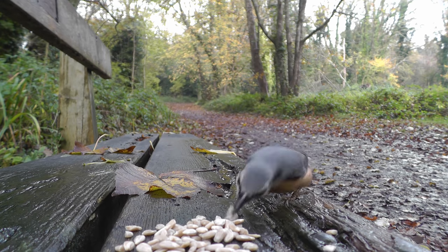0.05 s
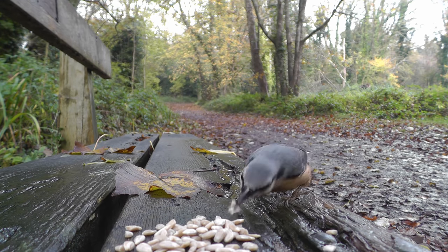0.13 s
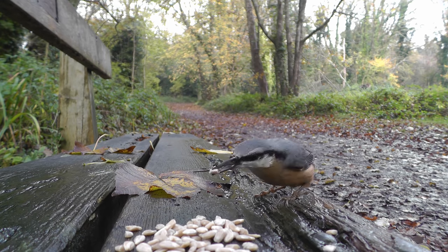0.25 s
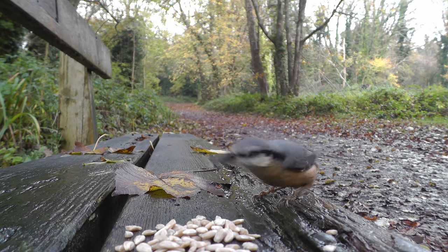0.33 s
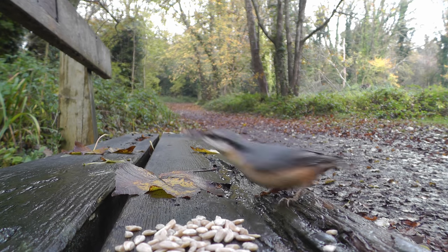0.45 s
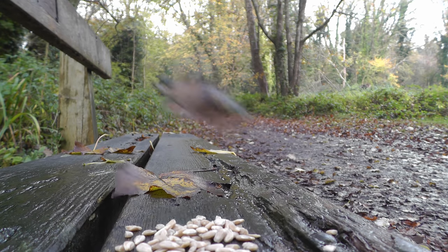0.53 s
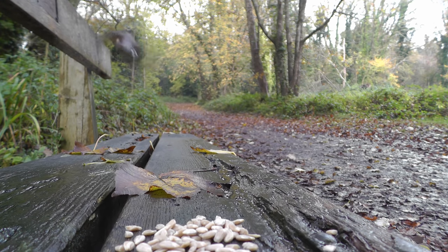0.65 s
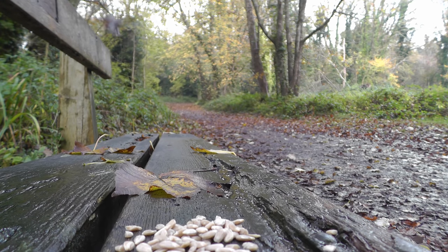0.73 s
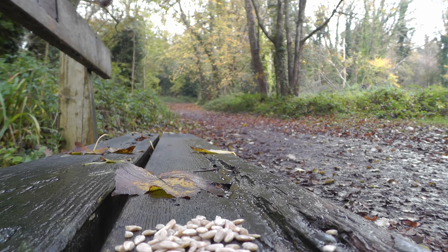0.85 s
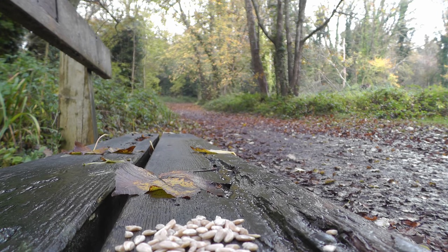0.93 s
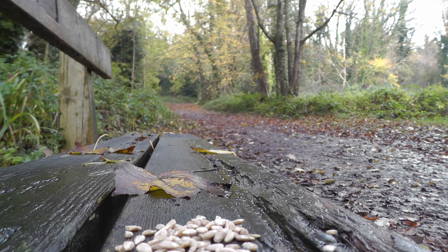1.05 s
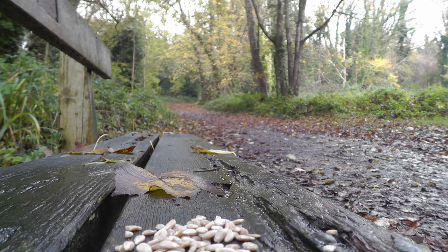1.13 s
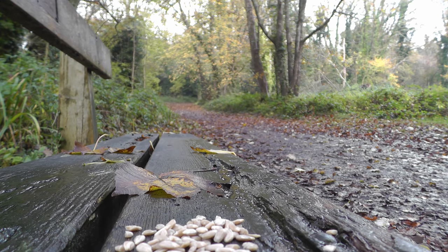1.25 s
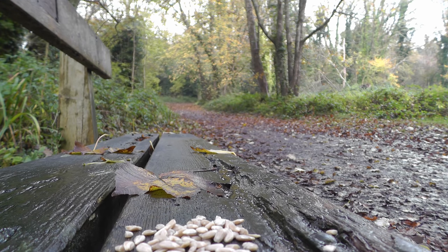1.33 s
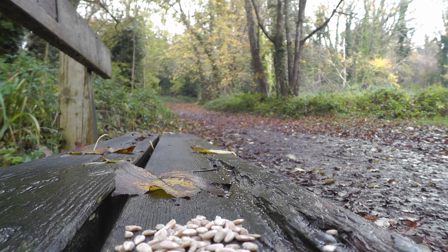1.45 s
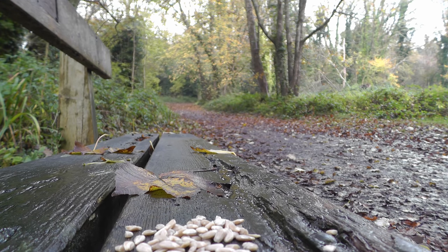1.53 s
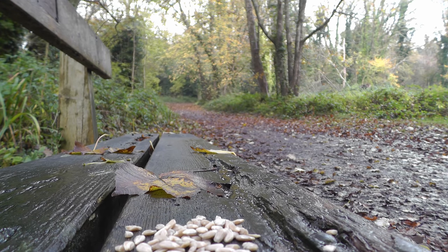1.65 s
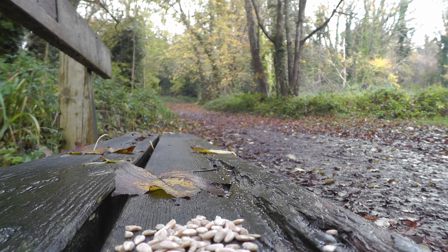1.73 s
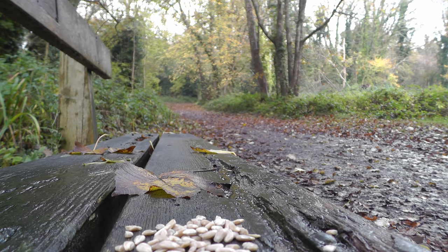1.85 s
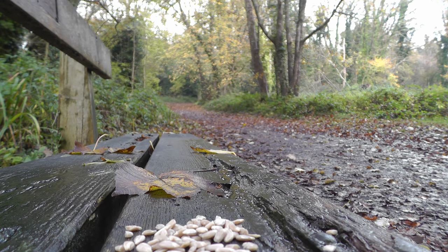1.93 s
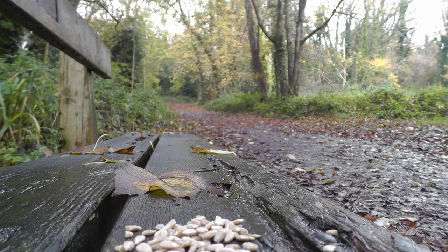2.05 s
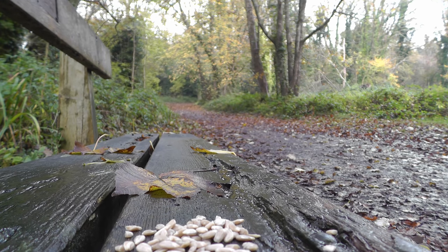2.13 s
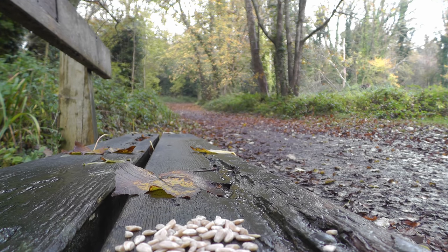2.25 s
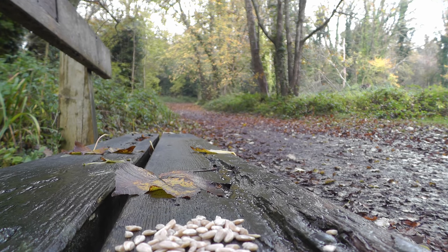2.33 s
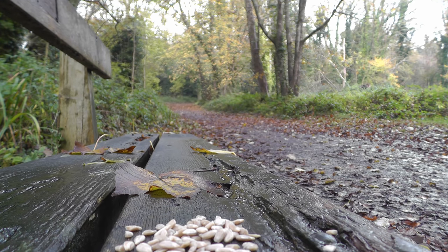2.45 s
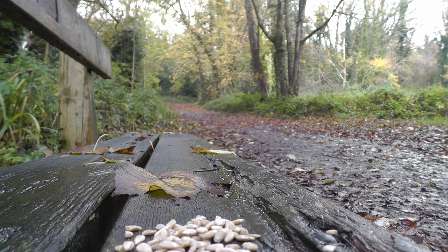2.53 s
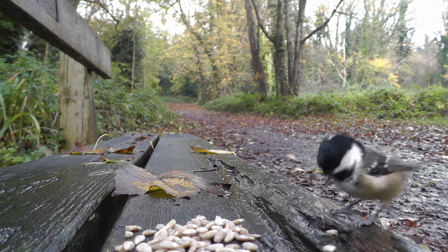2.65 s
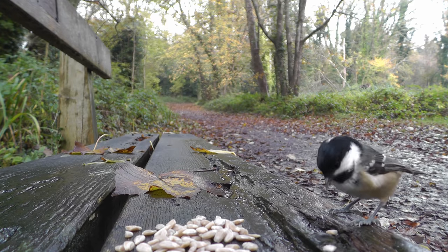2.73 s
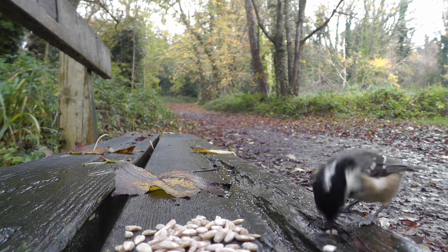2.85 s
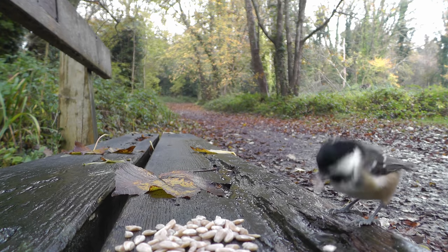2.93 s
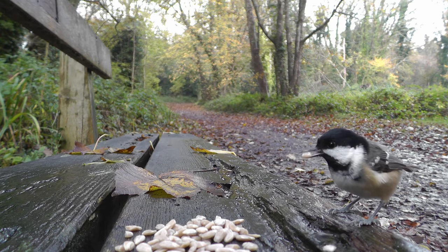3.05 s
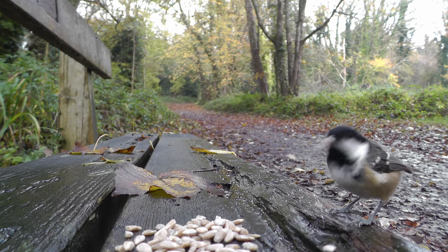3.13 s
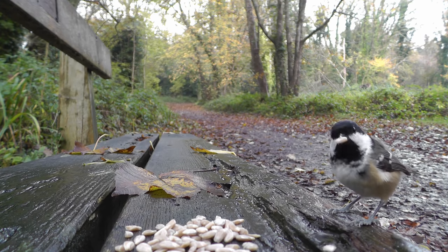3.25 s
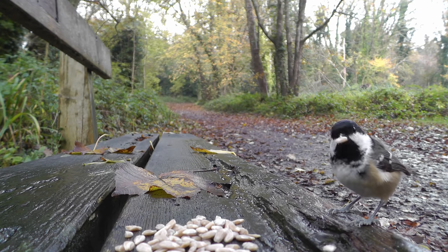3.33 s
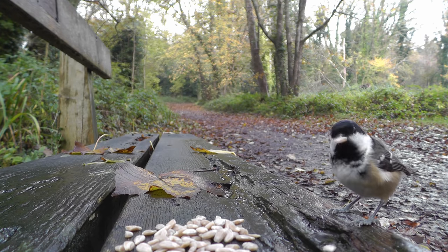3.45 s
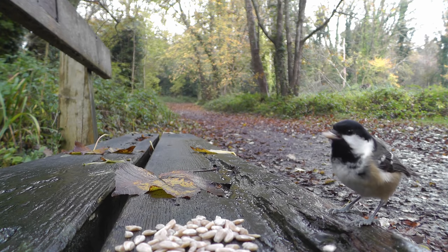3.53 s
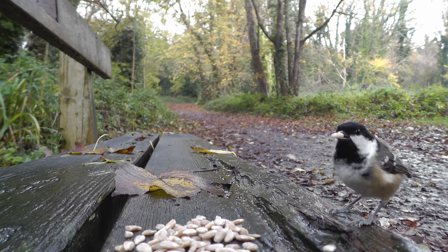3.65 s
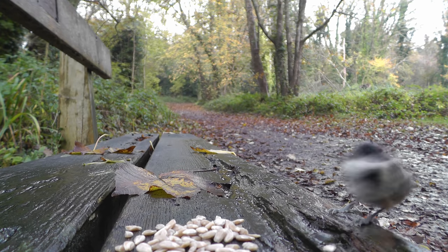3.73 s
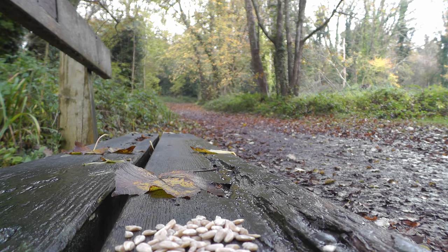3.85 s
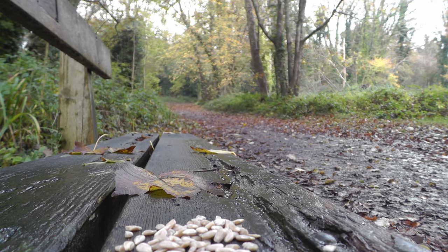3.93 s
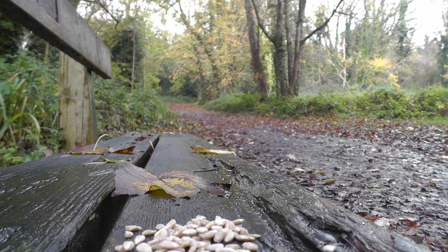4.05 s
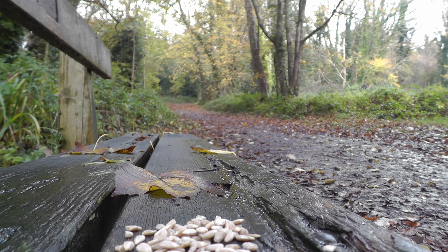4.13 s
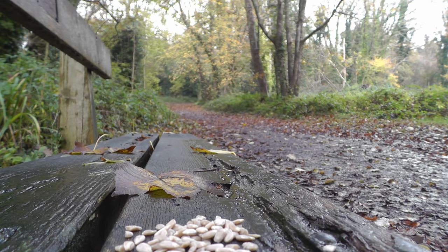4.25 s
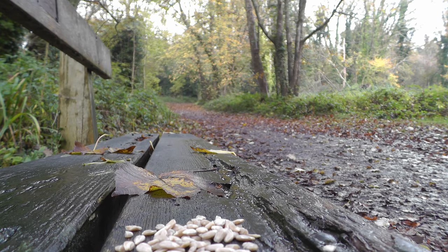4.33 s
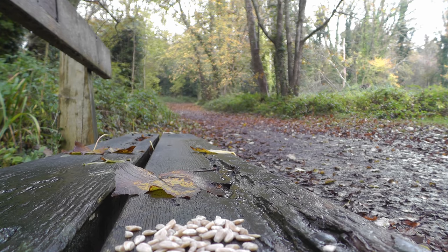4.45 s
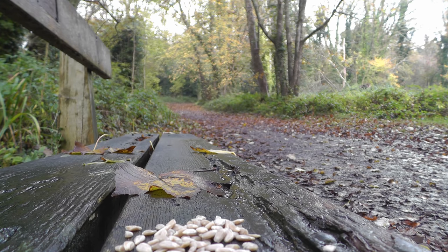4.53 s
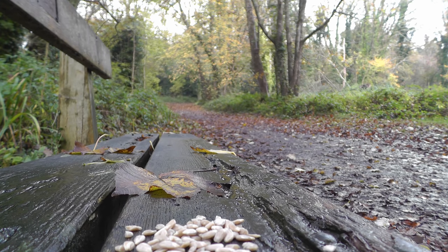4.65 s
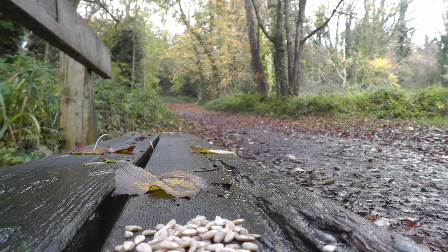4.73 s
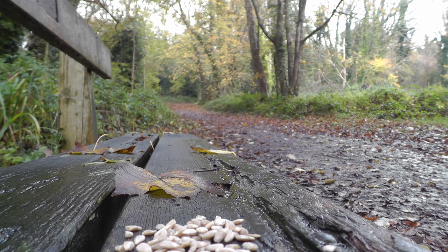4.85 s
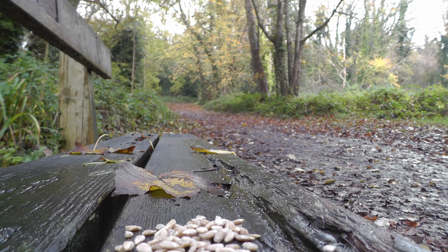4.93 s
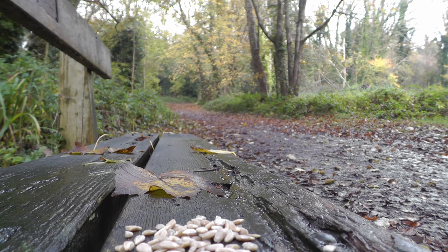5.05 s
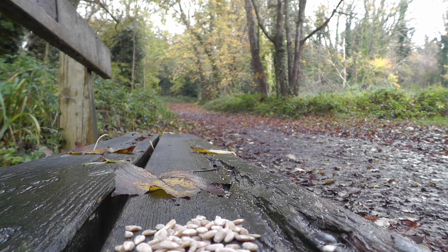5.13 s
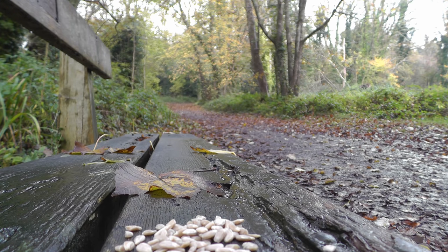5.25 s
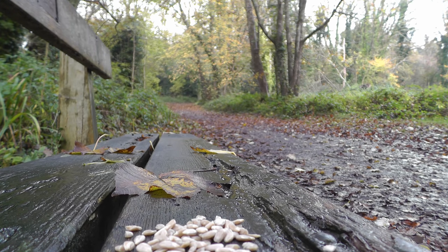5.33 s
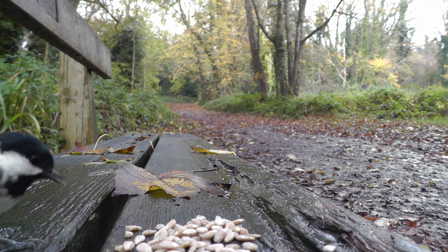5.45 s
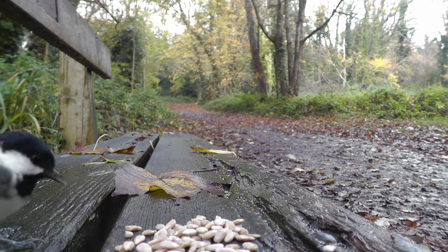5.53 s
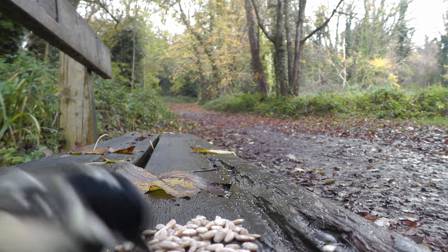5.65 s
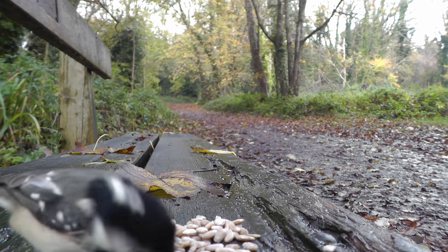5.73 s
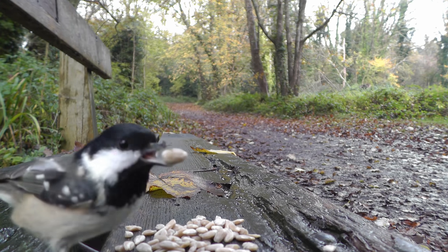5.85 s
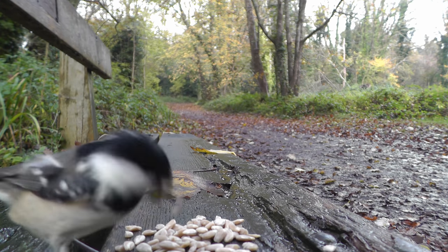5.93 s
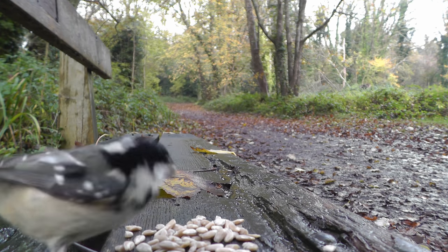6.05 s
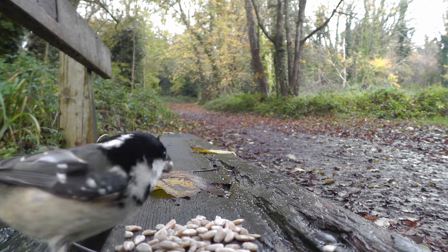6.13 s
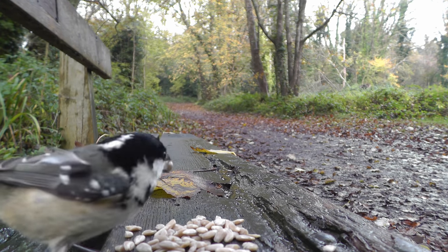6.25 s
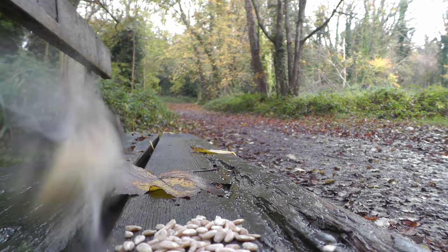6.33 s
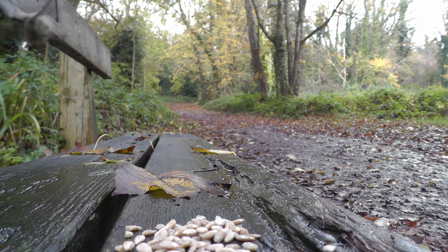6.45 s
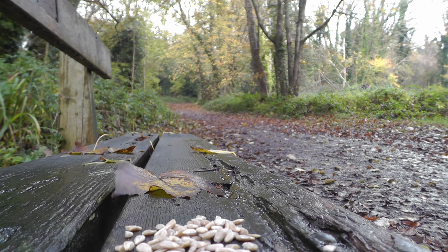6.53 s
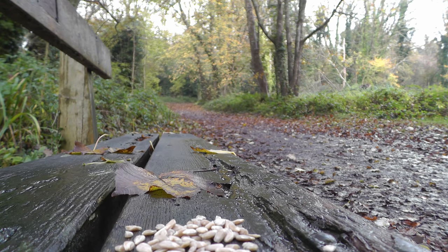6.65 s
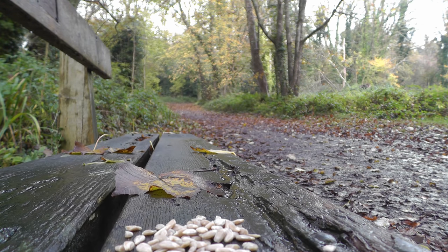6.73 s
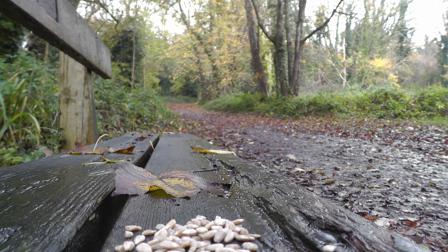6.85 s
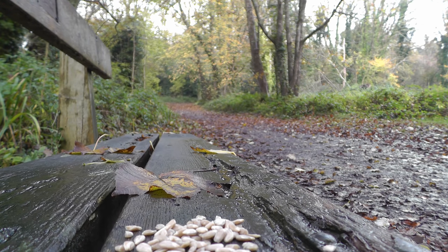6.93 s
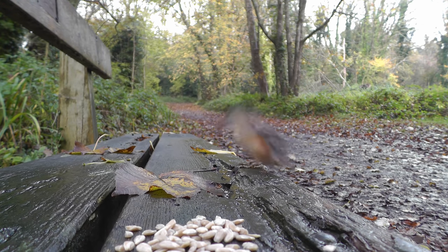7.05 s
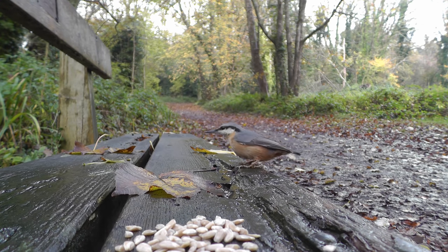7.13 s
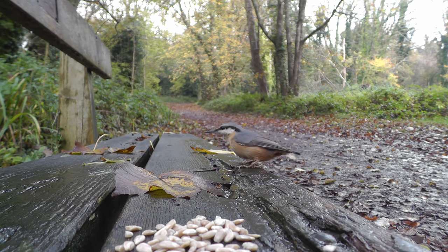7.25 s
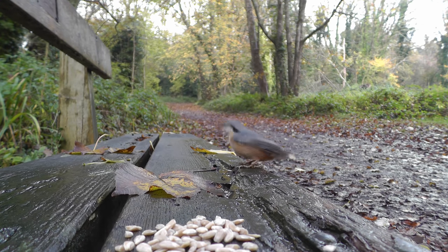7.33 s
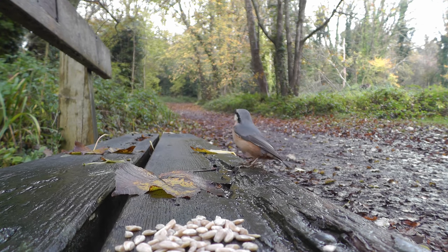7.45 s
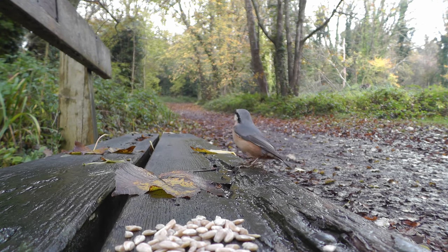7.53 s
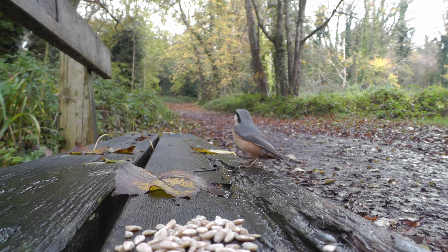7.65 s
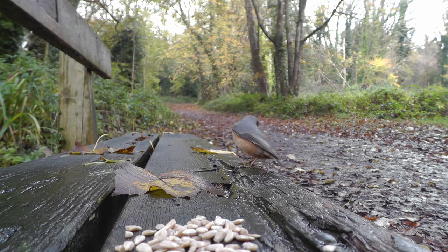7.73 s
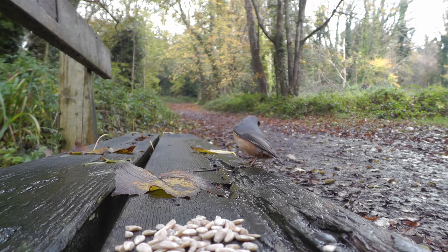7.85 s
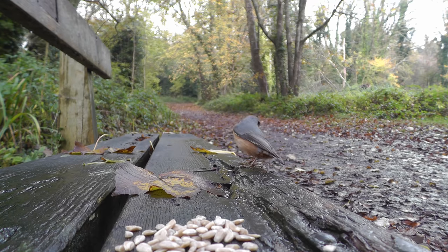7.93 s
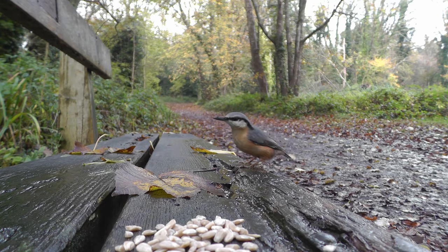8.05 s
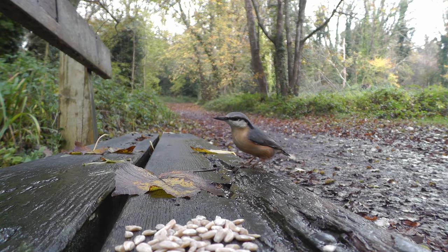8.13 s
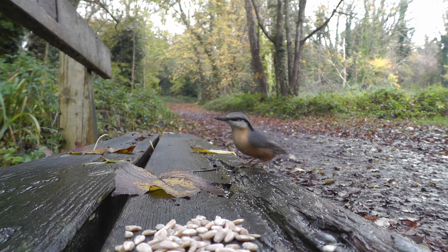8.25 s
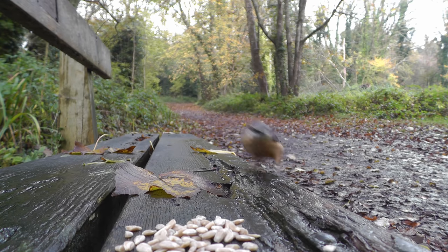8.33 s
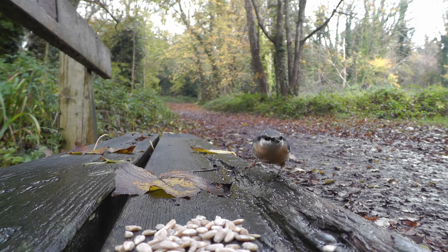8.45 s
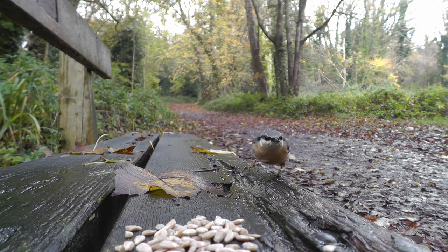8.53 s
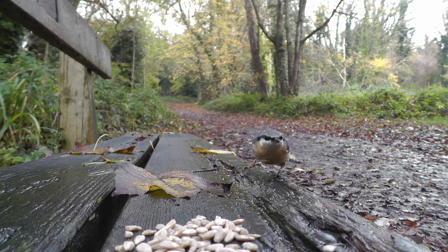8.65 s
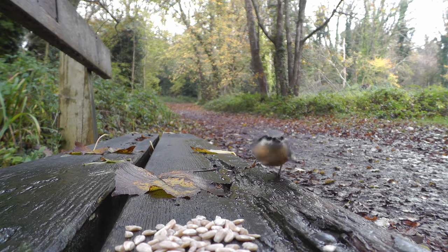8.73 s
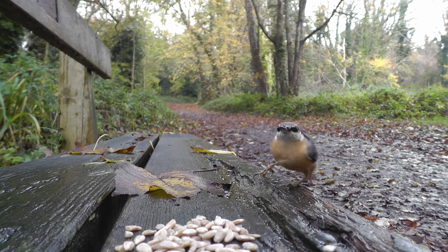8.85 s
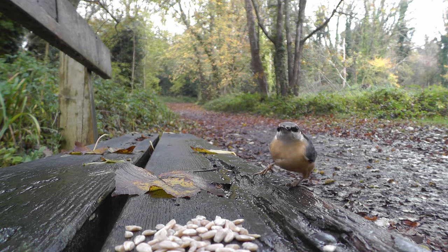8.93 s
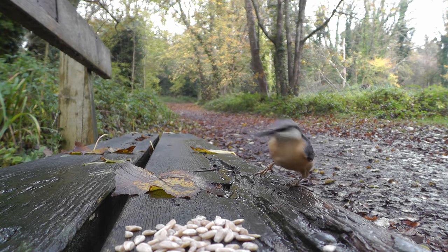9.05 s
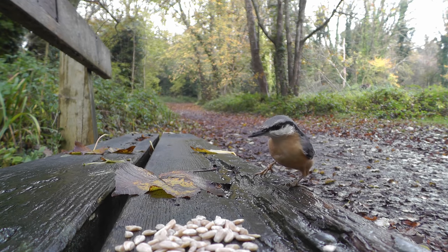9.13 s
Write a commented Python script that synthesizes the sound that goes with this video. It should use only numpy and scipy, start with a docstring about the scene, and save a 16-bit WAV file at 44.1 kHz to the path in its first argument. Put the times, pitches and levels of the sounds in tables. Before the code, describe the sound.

A quiet, wide murmur of far road and leaves runs throughout, heard close to a wooden bench among echoing trees. At 0.5 s a loud, high chip meets a fast flutter of about six wingbeats, with ticks and weakening chips to 1.2 s. A small low double caw comes at 1.7 s amid faint chips. Wings approach at 2.3-2.6 s, ending in sharp landing ticks. At 3.75-4 s a takeoff drums strongly with deep air thumps, then a thin wavering whistle and a far sliding note. Rapid scolding chatter runs 5.1-5.4 s, with brief bursts after 6 s. Wings flurry at 6.3-6.5 s; bright sliding notes and chips cluster at 6.7-6.95 s as another bird flutters in, landing with a tick near 7.05 s. A chip follows at 7.3 s, short chatter at 7.85 s, a clear clicked chip at 8.73 s, then a light scuff and tiny ticks.

```python
"""Small birds' wings drum past the microphones: each stroke is a low air push, a flap and a feather hiss.
Near birds give short arched chips and one held whistle, built from sliding tones. Farther birds send
sliding notes, a low caw and chatter, smeared by the trees into echoes made from fading noise. Claws and
bills tick and scuff on a wooden bench, and a click opens one chip: short bursts through a resonance.
A far road and leaves murmur as shaped noise."""
import sys
import numpy as np
from scipy import signal
from scipy.fft import rfft, irfft, next_fast_len
from scipy.io import wavfile
from scipy.ndimage import uniform_filter1d, map_coordinates

SR = 44100
rng = np.random.default_rng(int(sys.argv[2]) if len(sys.argv) > 2 else 0)


def dump(signal):
    """Clip the signal to [-1, 1] and save it as 16-bit WAV at the path in sys.argv[1]."""
    limited = np.clip(np.atleast_2d(signal).T, -1, 1)
    pcm = np.round(limited * 32767).astype(np.int16)
    wavfile.write(sys.argv[1], SR, pcm)


N = 405719

# Road murmur and leaves, shape of the spectrum: pitch_hz, relative_level_db
AIR_SPECTRUM = [(20, -35), (50, -16), (110, -0.5), (210, -1.5), (440, -8), (650, -8), (1270, -13),
                (2160, -22.5), (2780, -18), (3900, -23), (4600, -19.5), (5840, -20.5), (7000, -24),
                (11300, -38)]
# How much the murmur is shared by left and right: pitch_hz, likeness (1 = the same)
AIR_LIKENESS = [(60, 0.9), (180, 0.96), (550, 0.9), (1650, 0.62), (4970, 0.97), (15000, 0.35)]
# How far the murmur leans to the left: pitch_hz, left_over_right_db
AIR_LEAN = [(60, -0.5), (950, -1), (15000, -1.5)]
AIR_DB = -47.5
TOP_HZ = 15830  # nothing is kept from here up

# Claws or feather tips dragging: start_s, length_s, level_db (before its swell), centre_hz
SCUFFS = [(8.775, 0.043, -48.5, 1170), (2.45, 0.1, -53, 4700)]
# Short ticks: claws and bills on the planks, and the click that opens the chip at 8.73 s:
# start_s, peak_db (before panning), ring_hz
SHORT_TICKS = [(0.027, -35.5, 5860), (.555, -41, 3300), (.628, -34.5, 3100), (0.672, -46, 3480),
               (.8135, -31, 4240), (1.944, -38, 1500), (2.591, -32, 4800), (2.5946, -28.5, 3800),
               (3.767, -27, 2960), (5.366, -36, 3000), (5.377, -33, 2760), (7.0416, -25, 1300),
               (7.046, -38, 10000), (7.0518, -39, 12000), (7.0612, -41, 12000), (7.986, -44, 9000),
               (8.431, -39, 8000), (8.732, -28, 5200), (8.938, -41, 9000), (9.114, -38, 10000)]

# Sliding far notes, some two-voiced (two rows); near 1.7 s a low caw, sung twice, with its harmonic:
# start_s, length_s, start_hz, end_hz, level_db (before wavering)
FAR_NOTES = [ (0.462, 0.062, 7270, 6770, -50), (0.473, 0.047, 8140, 8030, -54.5),
             (1.379, 0.074, 7160, 6800, -68), (1.7, 0.027, 1333, 965, -47.5),
             (1.705, 0.025, 2480, 1820, -52), (1.731, 0.023, 1540, 980, -51), (1.86, 0.06, 6660, 6220, -68),
             (3.387, 0.019, 8300, 6850, -53), (3.522, 0.043, 8330, 7480, -49),
             (4.142, 0.073, 7420, 6900, -44), (4.143, 0.095, 8500, 7740, -53),
             (5.04, 0.043, 7930, 7630, -62), (5.923, .04, 8160, 6770, -55.5),
             (6.687, 0.0416, 8330, 7970, -28.5), (6.683, 0.032, 9900, 8830, -42),
             (6.743, 0.051, 8090, 7730, -27), (8.547, 0.032, 7960, 8200, -70),
             (9.157, .014, 7800, 7550, -59)]
FAR_ECHO_DB, FAR_WETTER = 0.5, 0.3  # echo over a -30 dB, 8 kHz note; dB more for each dB fainter
LOW_DRIER_DB = 2.5  # leaves scatter low notes less: echo dB lost per octave down

# Scolding bursts: first_syllable_s, last_syllable_s, syllables, slowing_share, first_top_hz, last_top_hz,
# bottom_hz, first_level_db, last_level_db, direct_gain_db (levels before random changes)
CHATTER_RUNS = [(5.111, 5.426, 9, .24, 8700, 7540, 4940, -42, -39.5, -1.5),
                (6.071, 6.113, 2, 0, 7060, 7000, 5020, -34.5, -38, -1),
                (6.284, 6.284, 1, 0, 7070, 6800, 4650, -36.5, -36, -8),
                (7.834, 7.863, 2, 0, 7780, 7740, 4400, -35.5, -40.5, 4.5)]
SYLLABLE_S, SYLLABLE_SCATTER_S = .005, .0006
BOUNCES, BOUNCE_S, BOUNCE_DB = 6, .016, -9  # copies off ground and branches, time they fill, change by its end

# One held near call: time_s, pitch_hz, level_db (both before wavering)
WHISTLE_PATH = [(3.964, 6340, -29), (3.972, 6740, -26.5), (3.982, 7020, -24), (4.022, 6880, -27.5),
                (4.035, 6500, -28), (4.048, 6580, -28.5), (4.057, 5670, -36)]

# Near chips, following their strongest partial: start_s, length_s, top_hz, end_hz, level_db (before shaping),
# upper_partials_db, lower_partial_db, side_partials_fade_db, left_over_right_db
CHIPS = [ (0.513, 0.026, 7970, 7100, -20.5, -26, -30, 17.5, 2.5),
         (0.760, 0.022, 7680, 7000, -29.5, -27, -28, 4, 2),
         (0.976, 0.024, 7600, 6700, -39.5, -18, -19, 0, 2),
         (1.241, 0.018, 7700, 7260, -46.5, -18, -18, 0, 0), (1.655, 0.017, 7800, 7200, -40, -30, -32, 0, 1),
         (2.124, 0.016, 7960, 7300, -46, -30, -28, 0, 2), (2.399, 0.022, 7930, 7400, -48.5, -30, -29, 0, 0),
         (5.453, 0.021, 8040, 7240, -46, -38, -40, 0, 2), (5.973, 0.017, 8330, 7460, -37, -19, -41, 0, 3),
         (6.318, 0.022, 8110, 7250, -40, -24, -36, 0, 4), (6.482, 0.027, 8090, 7360, -30.5, -46, -49, 0, 7),
         (6.638, 0.019, 7830, 7600, -43, -45, -45, 2, 8), (6.776, 0.018, 7930, 7900, -27, -22, -25, 22, 2),
         (6.944, 0.016, 7900, 7200, -24, -19.5, -35, 15, 0),
         (7.326, 0.023, 7760, 6950, -27, -16.5, -17.5, 0, 2),
         (8.733, 0.0255, 7990, 6700, -20.5, -15, -16.5, 6, -1)]
# Partials above the strongest: pitch_multiple, level_db, steepness (times the chip's upper_partials_db)
UPPER_PARTIALS = [(1.5, -1.5, 1.21), (2, 1, 1.7)]
# Richer chips start lower: lower_partial_db, start_pitch_over_top_pitch
CHIP_RISE = [(-48.5, .91), (-27.5, 0.81), (-16, 0.79)]
CHIP_ECHO_DB = -46.5  # the trees return the same level however loud the chip is
TOP_AT = 0.416  # share of a chip at which the arch peaks
SNAP_S, SNAP_DROP = .0003, .08  # the voice snaps up to pitch from this share below
ROUGH = 0.16  # phase scatter of the voice (radians)
RELEASE_DB = 5  # lost on the way down the arch
THROAT_DB_PER_KHZ = 6  # the strongest partial blooms near the top of the arch
HIGH_FADE_DB = 22  # lost over a chip for each pitch multiple above 1.5
LOWER_DB, LOWER_STEEP, LOWER_SWELL_DB = -3, 0.69, 3  # the lower partial gains toward the end
PLANK_S, PLANK_DB = (0.00066, .0011), -10.5  # bounce off the planks: left and right delay, level

# Flights: first_stroke_s, last_stroke_s, strokes, slowing_share, nearest_share (0-1), start_loss_db,
# end_loss_db, flap_db, push_db, hiss_db (the last three at the nearest point, before shaping)
FLIGHTS = [(.473, 0.696, 6, .011, 0.34, 11, 6.5, -34.5, -25.5, -54),
           (.805, .805, 1, 0, .5, 0.5, 0, -38, -34, -67),
           (2.32, 2.58, 8, -.05, 0.85, 17.5, 3, -35, -23, -55),
           (3.769, 3.951, 6, -0.014, 0.45, 1.5, 15.5, -29, -19, -53),
           (6.322, 6.514, 6, .005, .2, 10, 8.5, -35.5, -20.5, -59),
           (6.866, 6.984, 4, -.2, .7, 3, 0, -32.5, -33.5, -53.5),
           (7.043, 7.043, 1, 0, 0.45, 0, 0, -34, -36, -62)]
# Low lumps of stirred air reaching the microphones: start_s, push_db (before shaping), pitch_hz
AIR_LUMPS = [(.524, -38, 103), (.785, -31.5, 94), (.805, -35, 133), (0.868, -26, 85.4), (.89, -27, 122),
             (0.942, -26.5, 129), (3.747, -35, 72), (3.798, -19.5, 104), (3.899, -11.5, 164),
             (3.923, -10.5, 134), (3.985, -28.5, 131), (6.339, -33, 103), (6.913, -36.5, 81),
             (7.052, -38, 101)]
# Shape of the flap's spectrum: pitch_hz, relative_level_db
FLAP_SPECTRUM = [(150, -63), (300, 11.5), (500, 11), (900, -1), (1600, -10), (3000, -55)]
# Shape of the feather hiss's spectrum: pitch_hz, relative_level_db
FEATHER_SPECTRUM = [(1000, 13), (2000, -0.5), (3200, 4.5), (4200, 0.5), (8500, -2), (12000, -15.5),
                    (15800, -14)]
# Middles of the bands in which feather tufts rustle separately: pitch_hz
TUFT_HZ = (1200, 2200, 3600, 5500, 8500, 13000)
PUSH_HZ, PUSH_GROWS, HISS_GROWS = 228, 1.4, 0.62  # mean pitch; push and hiss swing this many times the flap's dB
LUMP_FLAP_DB = -26  # flap relative to its lump, before shaping
# A smaller, rising slap as the wings fold: time, width, size, middle pitch, rise
FOLD_S, FOLD_WIDE_S, FOLD, FOLD_HZ, FOLD_RISE_HZ_PER_S = .016, 0.0044, 0.26, 470, 35000
DRAG_S = .019  # the feathers hiss as the wing returns


def amp(db):
    """Turn decibels into a multiplier."""
    return 10 ** (np.asarray(db) / 20)


def unit(x):
    """Scale to an average (RMS) size of one."""
    return x / np.sqrt(np.mean(x ** 2) + 1e-20)


def along(points, hz):
    """Read a curve of (Hz, value) points on a log pitch axis."""
    f, v = np.transpose(points)
    return np.interp(np.log(hz + 1), np.log(f + 1), v)


def filtered(x, response):
    """Shape a sound by a response that depends on frequency."""
    m = next_fast_len(x.shape[-1] + 8192)
    return irfft(rfft(x, m) * response(np.fft.rfftfreq(m, 1 / SR)), m)[..., :x.shape[-1]]


def add(out, s, sound, pan_db):
    """Mix a sound in at s seconds, leaning left by pan_db."""
    sound = sound * amp([[pan_db / 2], [-pan_db / 2]])
    start = round(s * SR)
    out[:, start:start + sound.shape[1]] += sound


def pair(size, alike):
    """Make left and right noises that share a common part."""
    a, b = rng.standard_normal((2, size))
    turn = np.arccos(np.clip(alike, -1, 1)) / 2
    return np.cos(turn) * a + np.sin(turn) * np.array([b, -b])


def wander(points, position):
    """A smooth random curve, read at positions counted in random points."""
    return map_coordinates(rng.standard_normal(points), [position])


def beats(first, last, count, slowing):
    """Share of the way and time of each beat in a run whose gaps widen (or shrink) evenly."""
    u = np.linspace(0, 1, round(count))
    return zip(u, first + (last - first) * (u - slowing * u * (1 - u)))


def trees(x, t60, near, alike):
    """Trunk echoes build up and die slowly; the ground and near branches answer at once."""
    t = np.arange(SR // 2 + SR // 4) / SR
    trunks = amp(-60 * t / t60) * (1 - np.exp(-(t / .012) ** 2))
    close_by = near * amp(-60 * t / .07)
    tail = pair(len(t), alike) * (trunks + close_by)
    return signal.fftconvolve(x[None], tail / np.linalg.norm(tail[0]), axes=1)


def sing(out, s, hz, db, echo_db, pan_db, near, soft):
    """One wavering tone along a pitch track, with its echoes; returns the phase for other partials."""
    phase = 2 * np.pi * np.cumsum(hz) / SR
    swell = np.abs(np.sin(np.pi * np.linspace(0, 1, len(hz)) ** 0.84))
    waver = wander(40, np.arange(len(hz)) * 300 / SR)
    tone = amp(db + 2.5 * waver) * np.sin(phase) * swell ** soft
    add(out, s, tone[None], pan_db)
    add(out, s, amp(echo_db) * trees(tone, t60=.75, near=near, alike=.55), pan_db / 2)
    return phase


def air():
    """A far road and leaves blend into a smooth wide murmur, with faint patches in time and pitch."""
    z = signal.stft(rng.standard_normal((2, N)), nperseg=512)[2]
    patches = uniform_filter1d(rng.standard_normal(z.shape[1:]), 6, 0)
    patches = uniform_filter1d(patches, 14, 1)
    both = signal.istft(z * amp(1.0 * unit(patches)), nperseg=512)[1][:, :N]

    def spread(hz):
        turn = np.arccos(np.clip(along(AIR_LIKENESS, hz), -1, 1)) / 2
        return amp(along(AIR_SPECTRUM, hz)) * [np.cos(turn), np.sin(turn)]

    def lean(hz):
        return amp(along(AIR_LEAN, hz) / 2 * np.array([[1], [-1]]))

    mid, side = filtered(both, spread)
    return amp(AIR_DB) * unit(filtered(np.array([mid + side, mid - side]), lean))


def scuffs():
    """A drag is many tiny grains of noise heard through a broad resonance."""
    out = np.zeros((2, N + SR))
    for s, length, db, centre_hz in SCUFFS:
        u = np.linspace(0, 1, round(length * SR))
        grains = pair(len(u), .85) * amp(5 * wander(120, u * length * 600))

        def resonance(f):
            damping = 1.4j * f * centre_hz
            return (damping / (centre_hz ** 2 - f * f + damping)) ** 2

        swell = np.abs(np.sin(np.pi * u)) ** 0.52
        add(out, s, amp(db) * unit(filtered(grains, resonance)) * swell, -1)
    return out[:, :N]


def ticks():
    """A tiny snap: one sharp onset and a spray of smaller ones through a wide resonance."""
    out = np.zeros((2, N + SR))
    t = np.arange(SR // 40) / SR
    for s, db, ring_hz in SHORT_TICKS:
        def resonance(f):
            damping = 1.7j * f * ring_hz
            ring = (damping / (ring_hz ** 2 - f * f + damping)) ** 2
            return ring / (1 + .45j * f / ring_hz) ** 2

        spray = pair(len(t), 0.69) * amp(-60 * t / 0.011)
        spray[:, 0] = 3.2  # the sharp onset
        snap = filtered(spray, resonance)
        add(out, s, amp(db) * snap / np.abs(snap).max(), rng.normal(-1.2, 1.8))
    return out[:, :N]


def far_notes():
    """Far voices slide in pitch; fainter notes have relatively more echo, lower ones less."""
    out = np.zeros((2, N + SR))
    for s, length, start_hz, end_hz, db in FAR_NOTES:
        echo_db = FAR_ECHO_DB - FAR_WETTER * (db + 30) + LOW_DRIER_DB * np.log2(start_hz / 8000)
        hz = np.linspace(start_hz, end_hz, round(length * SR))
        sing(out, s, hz, db, echo_db, pan_db=-1.0, near=1.0, soft=0.6)
    return out[:, :N]


def chatter():
    """Each syllable falls steeply in a blink, loudest late in the fall, and bounces at once."""
    out = np.zeros((2, N + SR))
    u = np.linspace(0, 1, round(SYLLABLE_S * SR))
    for (first, last, count, slowing, first_hz, last_hz, end_hz,
         first_db, last_db, direct_db) in CHATTER_RUNS:
        for along_run, s in beats(first, last, count, slowing):
            start_hz = first_hz + (last_hz - first_hz) * along_run
            db = first_db + (last_db - first_db) * along_run
            hz = (start_hz + (end_hz - start_hz) * u) * rng.normal(1, .03)
            tone = amp(db + rng.normal(0, .8)) * np.sin(2 * np.pi * np.cumsum(hz) / SR)
            tone = tone * amp(2.6 * wander(12, u * SYLLABLE_S * 1200))  # a harsh, fluttering voice
            forward = tone * np.abs(np.sin(np.pi * u ** 1.8)) ** .8
            s += rng.normal(0, SYLLABLE_SCATTER_S)
            add(out, s, amp(direct_db) * forward[None], -.6)
            for late in rng.random(BOUNCES):
                bounce = amp(late * BOUNCE_DB + rng.normal(-2.4, 1.8)) * forward[None]
                add(out, s + 0.0015 + BOUNCE_S * late, bounce, rng.normal(0, 2.3))
            # the trunks return more of the top of the fall
            upward = tone * np.sin(np.pi * u ** .7)
            add(out, s, amp(5) * trees(upward, t60=0.79, near=0.43, alike=0.95), -.6)
    return out[:, :N]


def whistle():
    """A held whistle whose strength and pitch waver, echoed by the trees."""
    out = np.zeros((2, N + SR))
    s, *cols = np.transpose(WHISTLE_PATH)
    t = np.arange(s[0], s[-1], 1 / SR)
    hz, db = [np.interp(t, s, c) for c in cols]
    waver, drift = [wander(40, (t - s[0]) * 170) for _ in range(2)]
    edges = np.clip(np.minimum(t - s[0], s[-1] - t) / 0.0024, 0, 1)
    tone = amp(db + 2.2 * waver) * edges * np.sin(2 * np.pi * np.cumsum(hz + 45 * drift) / SR)
    add(out, s[0], tone[None], pan_db=-5)
    add(out, s[0], amp(-37) * trees(tone, t60=.6, near=3, alike=.6), 0)
    return out[:, :N]


def chips():
    """A near voice snaps on, arches up and over with its partials, and bounces off the planks."""
    out = np.zeros((2, N + SR))
    for s, length, top_hz, end_hz, db, upper_db, lower_db, fade_db, pan_db in CHIPS:
        start_hz = top_hz * np.interp(lower_db, *np.transpose(CHIP_RISE))
        u = np.linspace(0, 1, round(length * SR))
        before = np.clip(1 - u / TOP_AT, 0, 1)
        after = np.clip((u - TOP_AT) / (1 - TOP_AT), 0, 1)
        # the pitch: an arch, the opening snap, then a little roughness
        climb = (start_hz - top_hz) * np.sin(1.2 * before) ** 2 / np.sin(1.2) ** 2
        hz = top_hz + climb + (end_hz - top_hz) * after ** 1.7
        hz = hz * (1 - SNAP_DROP * np.exp(-u * length / SNAP_S))
        hz = hz + ROUGH * SR / (2 * np.pi) * np.gradient(wander(80, u * length * 1800))
        # the strongest partial
        below_top_khz = uniform_filter1d(np.clip(top_hz - hz, 0, 1500), size=64) / 1000
        bloom_db = db - RELEASE_DB * after ** 2 - THROAT_DB_PER_KHZ * below_top_khz
        phase = sing(out, s, hz, bloom_db, CHIP_ECHO_DB - db, pan_db, near=0.5, soft=0.25)
        # the partials below and above it
        flicker = wander(40, u * length * 350)
        fade, late = fade_db * (u - .5), HIGH_FADE_DB * (u - .5)
        stack = amp(LOWER_DB + LOWER_STEEP * lower_db + LOWER_SWELL_DB * (u - 1.0)) * np.sin(phase / 2)
        for k, level, steepness in UPPER_PARTIALS:
            partial_db = steepness * upper_db + level - late * (k - 1.5) - RELEASE_DB * after ** 3
            stack = stack + amp(partial_db) * np.sin(k * phase)
        swell = np.abs(np.sin(np.pi * u)) ** 0.1
        add(out, s, (amp(db - fade + 2.2 * flicker) * stack * swell)[None], pan_db)
    bounce = [np.roll(x, round(late * SR)) for x, late in zip(out, PLANK_S)]
    out += amp(PLANK_DB) * np.array(bounce)
    return out[:, :N]


def strokes():
    """List s, push dB, push Hz, flap dB, hiss dB: flights swell when nearer; lumps have no hiss."""
    rows = [(s, db, hz, db + LUMP_FLAP_DB, -np.inf) for s, db, hz in AIR_LUMPS]
    for first, last, count, slowing, near, come_db, go_db, flap_db, push_db, hiss_db in FLIGHTS:
        for u, s in beats(first, last, count, slowing):
            far_db = np.interp(u, [0, near, 1], [-come_db, 0, -go_db])
            push_hz = PUSH_HZ * amp(rng.normal(0, 1))
            rows.append((s, push_db + PUSH_GROWS * far_db, push_hz,
                         flap_db + far_db, hiss_db + HISS_GROWS * far_db))
    return rows


def feather_hiss(size):
    """Feather barbs rustle in short tufts, each part of the spectrum on its own."""
    t = np.arange(size) / SR
    total = 0
    for hz in TUFT_HZ:
        tuft = pair(size, .65) * amp(5 * wander(40, t * 220))

        def band(f):
            return amp(along(FEATHER_SPECTRUM, f)) * np.exp(-np.log2(f / hz + .01) ** 2 / .35)

        total = total + filtered(tuft, band)
    return unit(total)


def wings():
    """Each downstroke pushes a lump of air at the microphones, flaps, and drags hiss through feathers."""
    out = np.zeros((2, N + SR))
    t = np.arange(SR // 8) / SR - .045  # starts early so the slow swells fit

    def hump(mid, wide):
        return np.exp(-((t - mid) / wide) ** 2)

    def wake_band(f):
        return (f / 70) ** 2 / (1 + (f / 70) ** 2) / (1 + (f / 170) ** 4)

    for s, push_db, push_hz, flap_db, hiss_db in strokes():
        push_turns = push_hz * (t - .007) + rng.normal(0.48, 0.065)
        push = np.cos(2 * np.pi * push_turns) * hump(0.0068, 0.62 / push_hz)
        if hiss_db > -np.inf:  # lumps have no folding slap
            fold_size = FOLD * amp(rng.normal(0, 2.2))
            since_fold = t - FOLD_S
            fold_hz = FOLD_HZ * rng.normal(1, 0.16) + FOLD_RISE_HZ_PER_S * since_fold / 2
            slap = np.sin(2 * np.pi * (fold_hz * since_fold + rng.random()))
            push = push + fold_size * hump(FOLD_S, FOLD_WIDE_S) * slap
        wake = unit(filtered(pair(len(t), 0.97), wake_band))
        flap = unit(filtered(pair(len(t), 0.98), lambda f: amp(along(FLAP_SPECTRUM, f))))
        hiss = feather_hiss(len(t))
        flap_shape = 0.53 * hump(0.0091, 0.0042) + 0.85 * hump(FOLD_S, 0.0043) + 0.2 * hump(0.016, 0.064)
        hiss_shape = hump(DRAG_S, 0.0067) + 0.66 * hump(0.0059, 0.035)
        stroke = amp(push_db) * (push + 0.23 * wake * hump(0.022, 0.015))
        stroke = stroke + amp(flap_db - 1.5) * flap * flap_shape
        stroke = stroke + amp(hiss_db + 7.0) * hiss * hiss_shape
        add(out, s + t[0], stroke, rng.normal(-.4, 1.0))
    return out[:, :N]


def scene():
    """Add all the layers together."""
    return air() + scuffs() + ticks() + far_notes() + chatter() + whistle() + chips() + wings()


def record(dry):
    """Keep nothing at or above the band limit."""
    return filtered(dry, lambda hz: hz < TOP_HZ)


dry = scene()
out = record(dry)
dump(out)
```